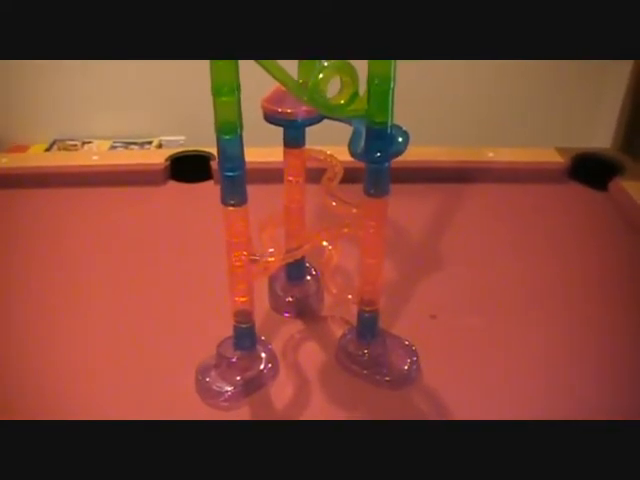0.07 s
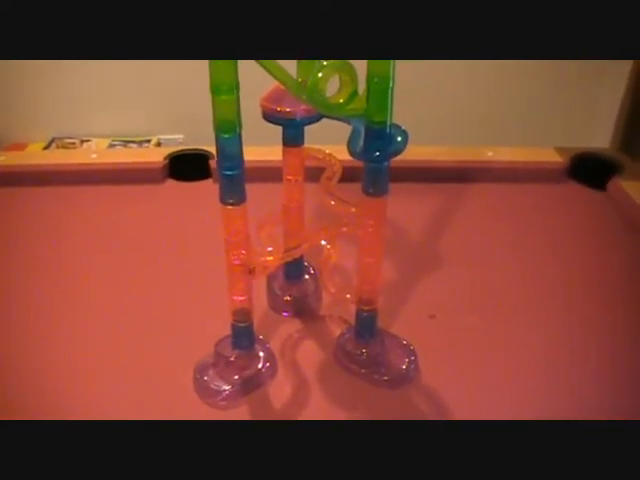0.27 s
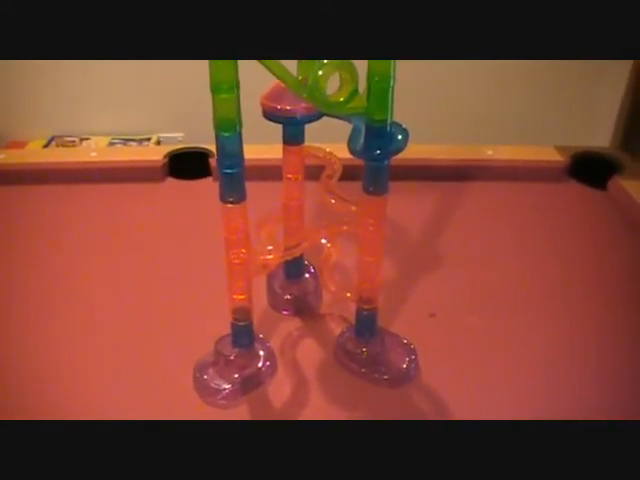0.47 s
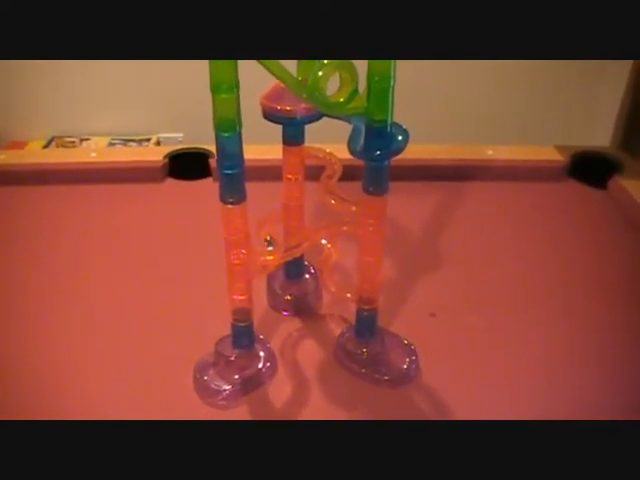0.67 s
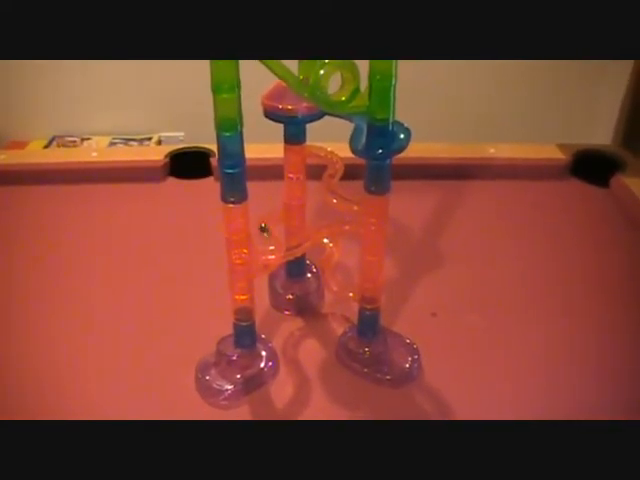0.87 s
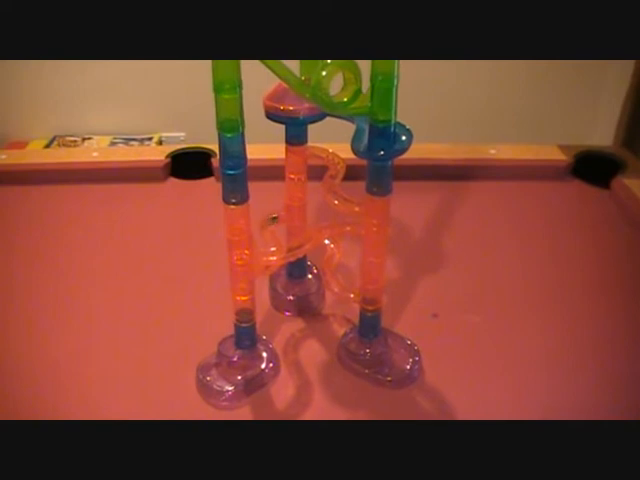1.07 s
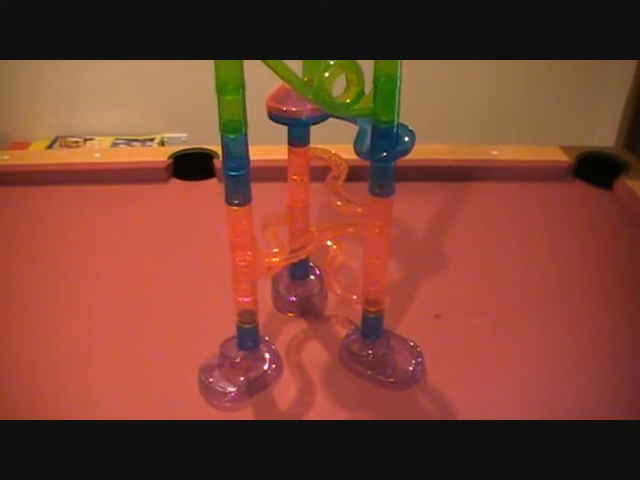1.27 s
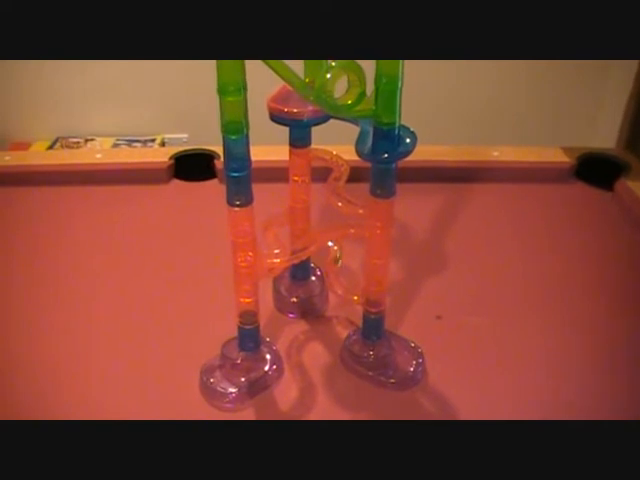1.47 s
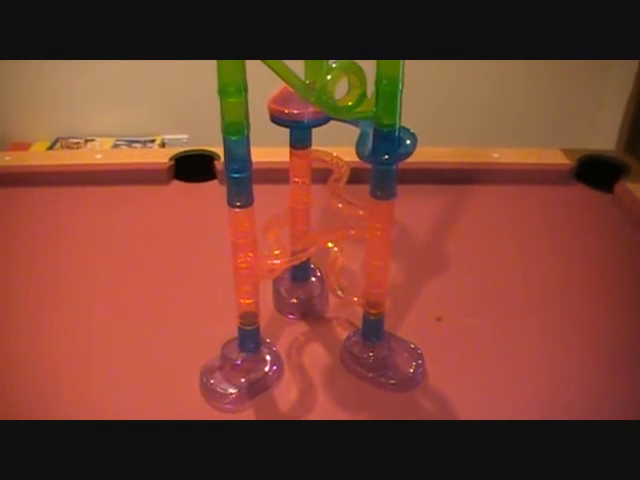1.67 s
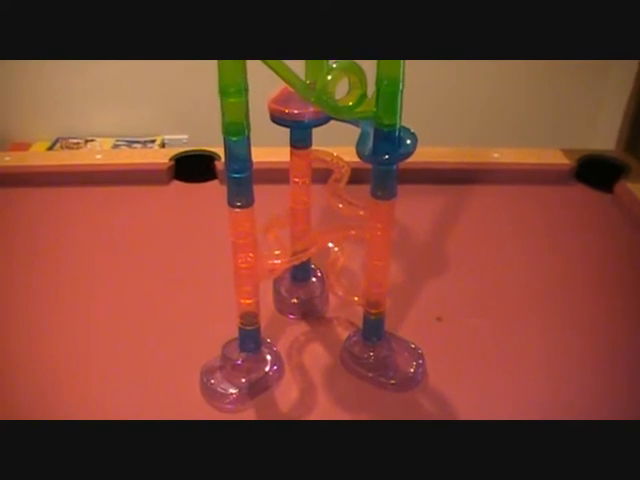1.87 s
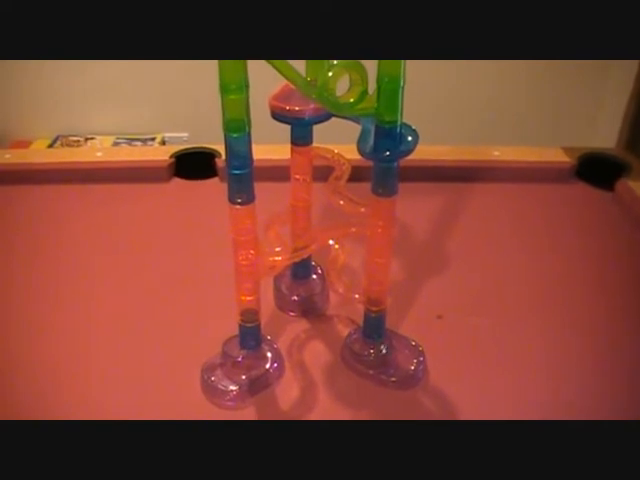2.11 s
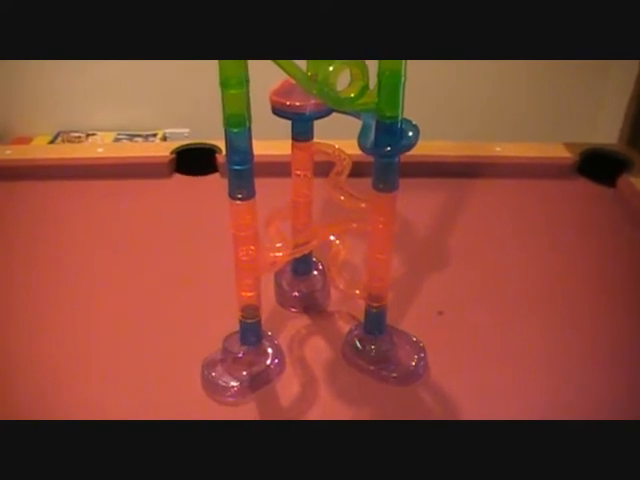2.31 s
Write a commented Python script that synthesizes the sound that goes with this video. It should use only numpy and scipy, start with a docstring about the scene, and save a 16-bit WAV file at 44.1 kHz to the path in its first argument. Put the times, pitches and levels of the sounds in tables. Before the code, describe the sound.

A marble rattles through a plastic toy tower near the microphone: a burst of sharp clacks, a quieter rolling stretch, then more knocks and a rattling drop into the base. A small, live room carries each clack over faint background noise.

```python
"""A glass marble runs down a plastic tower on a cloth-covered table in a small, live room.
It clatters down the upright tubes, ticks against the walls, rumbles along the chutes and drops into
the base with a thud. Hard blows ring the piece they hit; rolling is a stream of tiny bumps that
sets the chutes singing and humming. The thin plastic rings briefly, and the room carries every
clack over a faint low noise."""
import sys
import numpy as np
from scipy import signal
from scipy.fft import rfft, irfft, next_fast_len
from scipy.io import wavfile
from scipy.ndimage import uniform_filter1d

SR = 44100
rng = np.random.default_rng(int(sys.argv[2]) if len(sys.argv) > 2 else 0)


def master(y):
    """Save y as 16-bit WAV."""
    cut = np.clip(np.atleast_2d(y).T, -1, 1)
    pcm = np.round(cut * 32767)  # scale
    wavfile.write(sys.argv[1], SR, pcm.astype(np.int16))


N = 108045
HIT_S, CONTACT_S = .12, 0.00056  # length of one hit; its build-up while the marble presses in

# The voice of each plastic piece, one resonance a row: pitch_hz, width_hz, level_db
TOP_JOINT = [(804, 240, 10), (1020, 77, 21), (1750, 750, 21), (2650, 370, 13.5), (3490, 110, 28.5),
             (3980, 300, 25), (5550, 420, 24), (6820, 380, 10.5), (7890, 230, 16)]
UPPER_TUBE = [(800, 480, 8.7), (1200, 200, 13), (1696, 500, 16), (2200, 76, 15), (2740, 140, 18.3),
              (3360, 170, 11), (4130, 960, 18), (5700, 420, 17.4), (6220, 300, 20), (7000, 380, 18.5),
              (7850, 1100, 17)]
UPPER_BEND = [(600, 144, 14), (900, 300, 13.2), (1053, 110, 25.4), (1810, 84, 24.7), (2040, 160, 21.3),
              (2500, 410, 9.5), (3260, 320, 15.2), (5500, 710, 7), (7560, 210, 13), (8400, 2100, 6)]
MIDDLE_TUBE = [(1040, 150, 17), (1980, 170, 19), (2600, 340, 18.3), (3420, 270, 18), (4280, 350, 20),
               (4640, 320, 20.6), (5380, 560, 22.4), (6150, 450, 18.7), (8800, 1400, 22)]
LOWER_BEND = [(950, 71, 21.6), (1394, 61, 19), (1870, 130, 17), (2600, 170, 9.1), (3320, 250, 12.7),
              (3990, 530, 12.2), (5210, 320, 13.3), (7400, 340, 12.2)]
LOWER_TUBE = [(613, 83, 19), (1110, 310, 16.6), (1500, 210, 17.6), (2200, 150, 19.5), (2740, 60, 24.7),
              (3220, 390, 20), (3716, 170, 20.5), (4400, 84, 12), (6940, 730, 8.8), (8200, 320, 4.9)]
BASE = [(700, 260, 16), (1020, 270, 20), (1520, 890, 21.5), (2600, 170, 10.6), (3300, 350, 6.4),
        (5470, 470, 9.6), (6800, 890, 20.4), (8100, 450, 20)]
# Head-on blows: start_s, piece, level_db, brightness_db_per_octave, thud_db, crack_db
BLOWS = [(0.2184, TOP_JOINT, -0.5, 0, -65, -25), (0.2492, UPPER_TUBE, 3.5, -3, -35, -21.5),
         (0.2551, UPPER_TUBE, -4.5, 3.5, -38, -26), (0.2703, UPPER_TUBE, -7, 4, -28.5, -22),
         (0.3353, UPPER_TUBE, -.5, 0.5, -55, -32), (1.269, UPPER_BEND, -1, 1, -45.5, -26.5),
         (1.2867, MIDDLE_TUBE, 1, -0.5, -25, -20.5), (1.3581, UPPER_BEND, 1, 3.5, -33, -20),
         (1.6807, LOWER_BEND, 0.5, 0, -63, -32), (1.706, LOWER_BEND, -1, 0, -58, -37),
         (1.7741, LOWER_BEND, -3.5, -2.5, -62, -43), (1.8994, LOWER_TUBE, 1, 1, -60, -33.5),
         (1.9696, BASE, 3, -1.5, -18, -20)]
def clacks():
    """A head-on blow rings the broad, quickly damped resonances of a piece over dense wall modes."""
    out, t = np.zeros(N), np.arange(int(HIT_S * SR)) / SR
    pivot_hz, travel_s, attack_s = 2000, .0012, 0.00028
    for start, piece, level_db, bright_db, _, _ in BLOWS:
        hz, width, db = np.array(piece, float).T[:, :, None]
        tilt_db = bright_db * np.log2(hz / pivot_hz)
        gain = undb(db + level_db + tilt_db) * 2 * np.pi * width / SR
        phase, lateness = rng.random((2, len(hz), 1))
        age = np.maximum(t - travel_s * lateness, 0)  # the resonances arrive one after another
        envelope = np.exp(-np.pi * width * age) * (1 - np.exp(-age / attack_s))
        ring = np.sum(gain * envelope * np.sin(2 * np.pi * (hz * age + phase)), axis=0)
        wall = unit(band(burst(t, t60=0.047), 1500, 4500)) * np.std(ring) * undb(-8)
        add(out, ring + wall * (1 - np.exp(-t / CONTACT_S)), start)
    return out


def thuds():
    """The same blows shove the whole tower: a bright crack and a damped swing with a deep underside."""
    out, t = np.zeros(N), np.arange(int(HIT_S * SR)) / SR
    underside = undb(-14) * band(fade(t, t60=0.0039), 25.3, 1000, order=1)
    swing = np.cos(2 * np.pi * 1340 * t) * fade(t, t60=0.0048) + underside
    for start, _, _, _, thud_db, crack_db in BLOWS:
        crack = band(burst(t, t60=0.016), 3990, 14500, order=1)
        add(out, struck(swing, thud_db) + struck(crack, crack_db), start)
    return out


# Glancing knocks: start_s, body_db, body_hz, clack_db, clack_hz, click_db, click_hz
KNOCKS = [(0.0702, -32.5, 1108, -32, 1704, -37.5, 4900), (0.1048, -37, 1160, -34.5, 1600, -53, 5780),
          (0.1197, -51, 633, -39, 1650, -44, 5700), (0.1354, -41, 780, -36, 1500, -62, 4860),
          (0.16, -33, 690, -41, 1500, -66, 4660), (0.2846, -26.5, 1098, -22, 4000, -22.5, 6540),
          (0.2977, -25, 734, -26, 2600, -27, 6920), (0.304, -37, 900, -28, 2214, -25.5, 6560),
          (0.349, -46, 880, -36, 2770, -28, 5850), (0.37, -30.5, 880, -25, 2568, -28.5, 4400),
          (0.4392, -35, 820, -31.5, 1480, -39.5, 6400), (0.4717, -40, 800, -28, 1410, -34, 5330),
          (0.5198, -31.5, 1190, -29.5, 1585, -38.5, 5600), (0.567, -32, 860, -29.5, 1747, -35.5, 4630),
          (0.6268, -30, 883, -33, 1836, -44.5, 4670), (0.672, -35, 862, -44, 1830, -71, 4970),
          (0.707, -43, 760, -52, 1750, -67, 5100), (0.752, -43.5, 850, -55, 1820, -71, 4930),
          (0.892, -47, 1026, -59.5, 1770, -77, 4950), (0.9302, -42, 723, -43, 1784, -51, 5570),
          (1.075, -42, 1020, -44, 2200, -59, 5500), (1.09, -36.5, 1076, -45, 1660, -68, 4900),
          (1.134, -38, 740, -49, 2115, -63, 7100), (1.153, -43, 1020, -40, 2190, -59, 7100),
          (1.183, -38, 1015, -42, 2020, -64, 5000), (1.2069, -38, 750, -37, 2090, -57, 5000),
          (1.22, -45, 1020, -62, 2130, -63, 7400), (1.3024, -34, 1080, -47, 4340, -32, 4900),
          (1.3475, -29, 1107, -25.5, 2640, -24, 7050), (1.382, -24, 910, -26.5, 1860, -29, 6530),
          (1.4747, -36, 1310, -31, 2060, -46, 7340), (1.6526, -53, 980, -37, 2087, -49, 8050),
          (1.7572, -30.5, 820, -37.5, 2695, -34, 4950), (1.7767, -32, 950, -25.5, 1803, -35, 7640),
          (1.8505, -43, 642, -32, 2500, -45.5, 4500), (1.981, -31, 640, -24.5, 3570, -29, 5160),
          (2.0102, -31.5, 602, -22, 2600, -23, 4430), (2.0292, -28, 1300, -22, 2560, -36, 4900),
          (2.046, -31, 1250, -26, 1520, -38, 4500), (2.0626, -30, 591, -26.5, 2770, -30, 6740),
          (2.1147, -23.5, 980, -37, 2600, -39, 6800), (2.1235, -24, 970, -19.5, 2500, -31, 6600),
          (2.14, -30.5, 1082, -55, 2580, -39.5, 8300), (2.2468, -33, 1020, -59, 2630, -53, 5330),
          (2.3012, -33, 952, -37, 2470, -49, 4600), (2.3088, -35, 890, -58, 2600, -45.5, 6750),
          (2.3657, -36.5, 640, -44, 2700, -49, 7740), (2.4334, -32, 678, -41, 2690, -41.5, 4720)]
# Body, clack and click layers: low_hz, high_hz, wall_t60_s, wall_db, ring_t60_s, ring_db
KNOCK_LAYERS = [(573, 1980, 0.036, -5.5, 0.058, -3.5), (1540, 3690, 0.085, -7.5, 0.057, -5),
                (4200, 8400, 0.024, -1.5, 0.0042, 4.5)]
def knocks():
    """A glancing knock: a snap, a soft low push and three bands of wall modes with one ring each."""
    out, t = np.zeros(N), np.arange(int(HIT_S * SR)) / SR
    for start, body_db, body_hz, clack_db, clack_hz, click_db, click_hz in KNOCKS:
        snap = struck(band(burst(t, t60=.007), 3000, 22000), click_db - 4.5)
        push = struck(band(burst(t, t60=0.073), 90, 520), body_db - 21.5)
        knock = snap + push
        voices = (body_db, body_hz), (clack_db, clack_hz), (click_db, click_hz)
        for (low, high, wall_t60, wall_db, ring_t60, ring_db), (db, hz) in zip(KNOCK_LAYERS, voices):
            knock += struck(band(burst(t, wall_t60), low, high, order=3), db + wall_db)
            knock += struck(struck_spot(t, hz) * fade(t, ring_t60), db + ring_db)
        add(out, knock * (1 - np.exp(-t / CONTACT_S)), start)
    return out


def struck_spot(t, hz):
    """A mode of the struck spot and two weaker neighbours blend into one broad ring."""
    upper, lower = hz * (1 + 0.07 * rng.uniform(0.52, 2.24, 2) * np.array([1, -1]))
    neighbours = np.sin(2 * np.pi * upper * t) + np.sin(2 * np.pi * lower * t)
    return np.sin(2 * np.pi * hz * t) + 0.22 * neighbours


# Fader moves of the roll, before each layer's trim: time_s, rumble_db, grit_db
ROLL_FADERS = [(0, -26, -25.5), (.04, -44.5, -42), (.08, -32, -34), (0.171, -34, -34.5), (.205, -46, -54),
               (.26, -29, -24), (.38, -31, -26.5), (.5, -40, -42), (.65, -33, -41.5), (0.762, -44.5, -71),
               (0.876, -63.5, -83.5), (0.901, -56.5, -71.5), (1.0, -46, -53.5), (1.06, -40, -52.5),
               (1.13, -38, -40.5), (1.2, -38.5, -55), (1.255, -56, -58), (1.39, -33, -28), (1.5, -38, -39),
               (1.62, -40.5, -41), (1.72, -36, -41), (1.84, -30, -37), (1.89, -65, -67), (1.96, -45, -58),
               (2.018, -25.5, -17.5), (2.14, -27, -29), (2.2, -32, -52), (2.288, -44, -56),
               (2.314, -32, -36), (2.399, -34.5, -46.5), (2.44, -31.5, -42)]
# Resonances of the chute: pitch_hz, width_hz, level_db
CHUTE_MODES = [(562.6, 63, 3.5), (640, 43, -8), (755.4, 18, 4), (880, 150, -0.5), (996, 152, -2),
               (1048, 26, -18), (1520, 280, -20.5)]
# Tone of the grit: frequency_hz, gain_db
GRIT_EQ = [(100, -52.5), (900, -41.5), (1400, 6), (1850, 1.5), (2600, 1.5), (3400, -7.5), (5000, -8),
           (8000, -15.5), (11000, -31), (15000, -12)]
def rolling():
    """Tiny bumps under the rolling marble ring the chute, with a gritty treble on top."""
    t = np.arange(N) / SR
    times, rumble_db, grit_db = np.array(ROLL_FADERS).T
    rumble = band(ring_modes(bumps(per_s=1900, spread_db=2.5), CHUTE_MODES), 450, 2020)
    grit = colour(bumps(per_s=650, spread_db=0), GRIT_EQ)
    grit = signal.fftconvolve(grit, burst(t[:int(HIT_S * SR)], t60=0.0147))[:N]
    rumble = steady(rumble, samples=2600) * undb(np.interp(t, times, rumble_db) - 9.5)
    grit = steady(grit, samples=3000) * undb(np.interp(t, times, grit_db) - 9)
    return rumble + grit


def bumps(per_s, spread_db):
    """Tiny impacts at random times; more spread makes their sizes more uneven."""
    chance, size, sign = rng.random(N), rng.exponential(size=N), rng.choice([-1, 1], N)
    return (chance < per_s / SR) * sign * undb(spread_db * np.minimum(size, 4))


# Modes of the whole tower: pitch_hz, t60_s, level_db
TOWER_MODES = [(222, .4, 1), (323, .45, 2), (620, .25, -2), (698, .25, -4), (850, .25, -3), (1098, .25, -3),
               (1295, .3, -2), (1357, .35, 1), (1492, .3, -2), (1839, .2, -8), (2495, .25, -6),
               (2682, .25, -6), (2821, .25, -5), (2979, .25, -5), (3905, .2, -11), (6250, .2, -8)]
def tower_ring(contacts):
    """The joined tubes ring on after every contact."""
    modes = [(hz, np.log(1000) / (np.pi * t60), db) for hz, t60, db in TOWER_MODES]
    return ring_modes(contacts, modes)


# Fader moves of the upper chute's singing and the lower chute's hum: time_s, level_db
SING_FADER = [(0, -74), (0.301, -46), (.45, -41), (.64, -52), (.8, -78), (0.921, -51.5), (1.03, -49.5),
              (1.1, -42), (1.22, -43.5), (1.3, -61), (2.45, -57)]
HUM_FADER = [(0, -55.5), (1.248, -67.5), (1.33, -40.5), (1.5, -44.5), (1.6, -49.5), (1.72, -41),
             (1.84, -52), (2.0, -41), (2.13, -52), (2.25, -73), (2.45, -75)]
# Resonances of the hum: pitch_hz, width_hz, level_db
HUM_MODES = [(126.6, 40, 0.5), (180, 25, -9.5), (228, 22, 9.5), (313.6, 18, 16.5), (349, 12.7, -14.5)]
def chute_tones():
    """Steady rolling keeps a narrow tone of the upper chute and the low hum of the lower one going."""
    t = np.arange(N) / SR
    push = rng.standard_normal(N)
    sing = band(resonate(push, hz=1102, width_hz=40), 1000, 1082)
    hum = band(ring_modes(push, HUM_MODES), 99, 330)
    sing_db = np.interp(t, *np.array(SING_FADER).T)
    hum_db = np.interp(t, *np.array(HUM_FADER).T)
    return steady(sing) * undb(sing_db) + steady(hum) * undb(hum_db)


# Swells of single wall modes: middle_s, length_s, pitch_hz, level_db
WALL_SWELLS = [(0.42, 0.42, 880, -43), (0.093, 0.21, 1200, -47), (1.428, 0.43, 1390, -41),
               (2.296, 0.3, 985, -45.5)]
def wall_rings():
    """One narrow wall mode swells and dies away as the marble rolls past its place."""
    out, t = np.zeros(N), np.arange(N) / SR
    for middle, length, hz, db in WALL_SWELLS:
        ring = resonate(rng.standard_normal(N), hz, width_hz=26)
        ring = resonate(ring, hz, width_hz=104)
        swell = np.cos(np.pi * np.clip((t - middle) / length, -.5, .5))
        out += steady(ring) * undb(db) * swell
    return out


# Early reflections: delay_s, level_db
ECHOES = [(.0118, -17.5), (0.0125, -13), (0.0165, -18.5)]
def near_echoes(direct):
    """The table and near walls throw back dull copies of the sound."""
    out, dull = np.zeros(N), band(direct, 160, 5500, order=1)
    for delay, db in ECHOES:
        add(out, undb(db) * dull, delay)
    return out


# Reverb bands: centre_hz, t60_s, level_db
REVERB_BANDS = [(120, 0.95, -2), (251, 0.8, 0), (520, 0.23, -1), (970, 0.57, -8.5), (1820, 0.46, -5.5),
                (4070, 0.27, -5), (7760, 0.31, -12), (14100, 0.18, -0.5)]
def room(send):
    """Diffuse reverberation with its own decay and level in each octave."""
    t, freqs = np.arange(SR) / SR, np.fft.rfftfreq(SR, 1 / SR)
    predelay_s, build_s = 0.0011, 0.00067
    onset = np.clip((t - predelay_s) / build_s, 0, 1)
    noise, tail = rfft(rng.standard_normal(SR)), 0
    for centre_hz, t60, db in REVERB_BANDS:
        share = along([(hz, hz == centre_hz) for hz, _, _ in REVERB_BANDS], freqs)
        envelope = fade(t, t60) * onset
        tail += irfft(noise * share, SR) * envelope * undb(db) / np.sqrt(np.sum(envelope ** 2))
    return undb(1) * signal.fftconvolve(send, tail)[:N]


# Tone of the background noise: frequency_hz, gain_db
ROOM_TONE_EQ = [(25, -17.5), (60, 0), (130, -5.5), (220, -4), (320, -0.5), (600, -3.5), (1500, -10),
                (4000, -24), (9000, -30), (15000, -36)]
def room_tone():
    """The room's faint, steady low noise."""
    return undb(-56.5) * unit(colour(rng.standard_normal(N), ROOM_TONE_EQ))


def undb(db):
    """Decibels to gain."""
    return 10 ** (np.asarray(db) / 20)


def unit(x):
    """Scale to rms 1."""
    return x / np.sqrt(np.mean(x ** 2) + 1e-20)


def steady(x, samples=4000):
    """Even out the slow swells of a ringing sound."""
    return x / np.sqrt(uniform_filter1d(x ** 2, samples) + 1e-12)


def struck(x, db):
    """Set the rms level of the first 6 ms of a hit."""
    return x * undb(db) / np.sqrt(np.mean(x[:int(.006 * SR)] ** 2))


def fade(t, t60):
    """Fall by 60 dB in t60 seconds."""
    return np.exp(-np.log(1000) * t / t60)


def burst(t, t60):
    """A dying cluster of many close modes with an even spectrum."""
    envelope = fade(t, t60)
    x = rng.standard_normal(len(t)) * envelope
    for _ in range(3):  # flatten the spectrum, then restore the decay
        spectrum = rfft(x)
        x = irfft(spectrum / (abs(spectrum) + 1e-12), len(t)) * np.minimum(1, 2 * envelope)
    return x


def resonate(x, hz, width_hz):
    """One resonance, gain 1 at its centre."""
    return signal.lfilter(*signal.iirpeak(hz, hz / width_hz, fs=SR), x)


def ring_modes(x, modes):
    """Drive several resonances side by side."""
    return sum(undb(db) * resonate(x, hz, width_hz) for hz, width_hz, db in modes)


def band(x, low_hz, high_hz, order=2):
    """Causal band-pass."""
    return signal.sosfilt(signal.butter(order, [low_hz, high_hz], "band", fs=SR, output="sos"), x)


def along(points, freqs):
    """Read (Hz, value) points on a log-frequency axis."""
    hz, values = np.array(points, float).T
    return np.interp(np.log(freqs + 1), np.log(hz), values)


def colour(x, points):
    """Minimum-phase EQ through (Hz, dB) points."""
    n = next_fast_len(2 * x.shape[-1])
    n += n % 2
    gain = undb(along(points, np.fft.rfftfreq(n, 1 / SR)))
    cepstrum = irfft(np.log(gain))
    cepstrum[1:n // 2] *= 2
    cepstrum[n // 2 + 1:] = 0
    return irfft(rfft(x, n) * np.exp(rfft(cepstrum)))[..., :x.shape[-1]]


def add(out, x, start_s):
    """Mix x into out at a given time."""
    i = int(start_s * SR)
    out[i:i + len(x)] += x[:max(0, len(out) - i)]


# Stereo width of the room: frequency_hz, side_against_mid_db
ROOM_WIDTH = [(50, -4), (125, 4.5), (250, 0), (600, -14.5), (1400, -11.5), (2800, -9), (5600, -6.5),
              (10000, -1), (15000, -4.5)]
def scene():
    """The marble straight ahead, its deepest thud to the right and the room all around."""
    contacts = knocks() + clacks() + rolling()
    direct = contacts + undb(-1.5) * tower_ring(contacts) + wall_rings()
    thud, tones = thuds(), chute_tones()
    send = direct + undb(-8) * thud + undb(-16) * tones
    mid = room(send) + room_tone() + near_echoes(direct)
    side = colour(room(send) + room_tone(), ROOM_WIDTH)
    sheen = resonate(resonate(direct, 9300, 2000), 9300, 2000)  # a narrow strip of treble spreads wide
    side += undb(-2.5) * sheen
    deep = band(thud, 15, 75) * undb([[-13.5], [9.5]])  # left, right
    return direct + thud + deep + undb(-1.5) * tones + mid + side * np.array([[1], [-1]])


# Tone of the microphone: frequency_hz, gain_db
MIC_EQ = [(30, -14.5), (200, -4), (420, -1.5), (620, 2.5), (1000, 0), (1600, -3.5), (2600, 0), (4400, -1),
          (7000, -2.5), (9500, -2.5), (12000, -8.5), (15500, -23.5)]
def record(dry):
    """Microphone colour, slightly rounded peaks and a steep top cut."""
    ceiling, top_hz = .95, 16000
    coloured = colour(dry, MIC_EQ)
    rounded = coloured / (1 + (coloured / ceiling) ** 4) ** .25
    return signal.sosfilt(signal.ellip(8, .2, 80, top_hz, fs=SR, output="sos"), rounded)


dry = scene()
out = record(dry)
master(out)
```